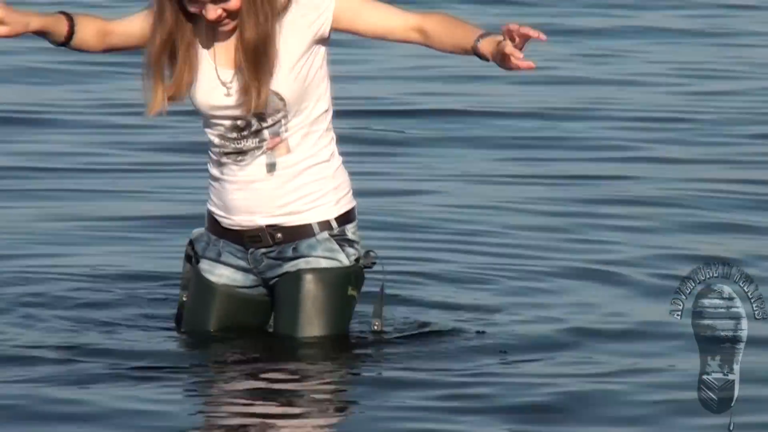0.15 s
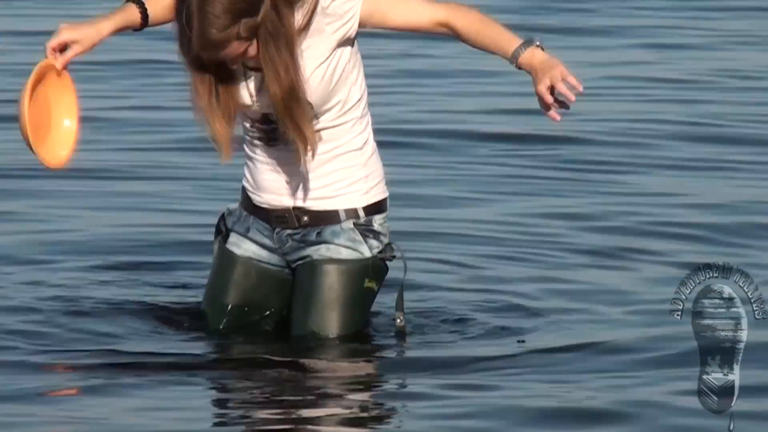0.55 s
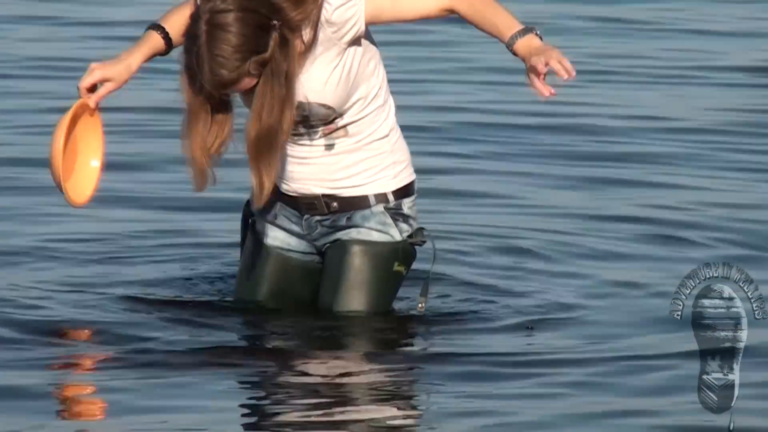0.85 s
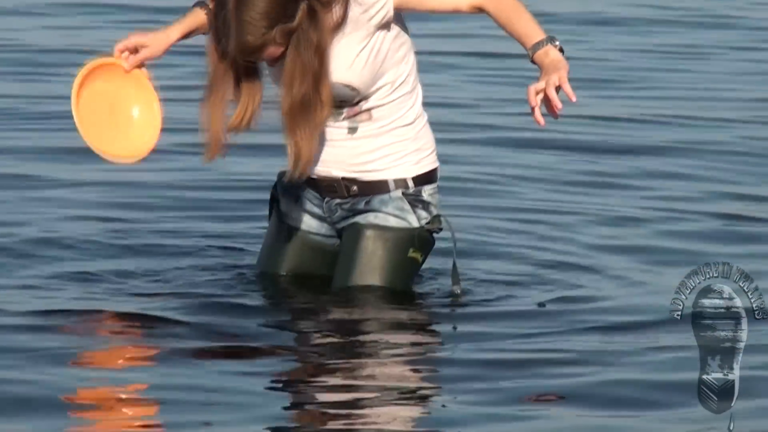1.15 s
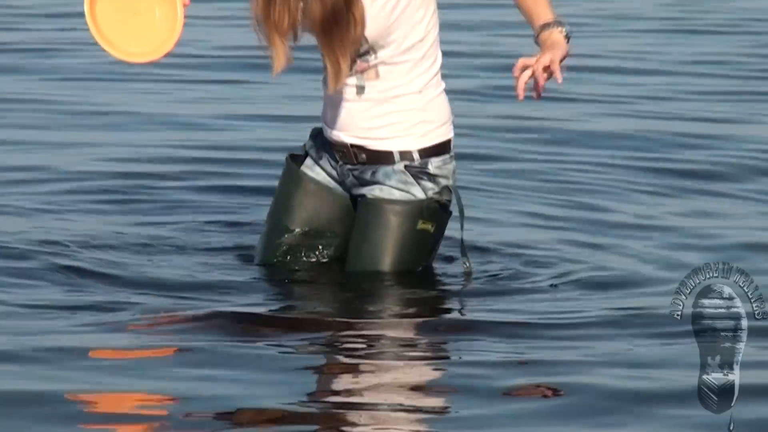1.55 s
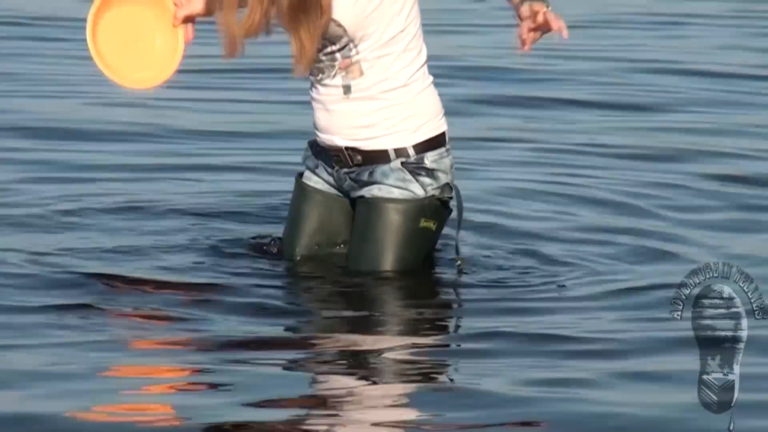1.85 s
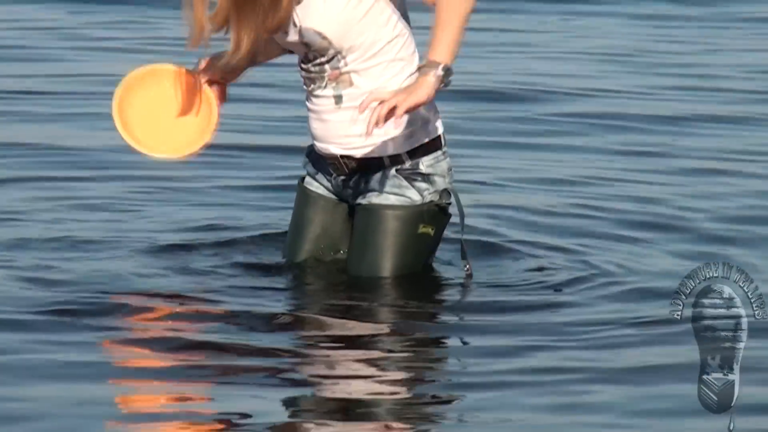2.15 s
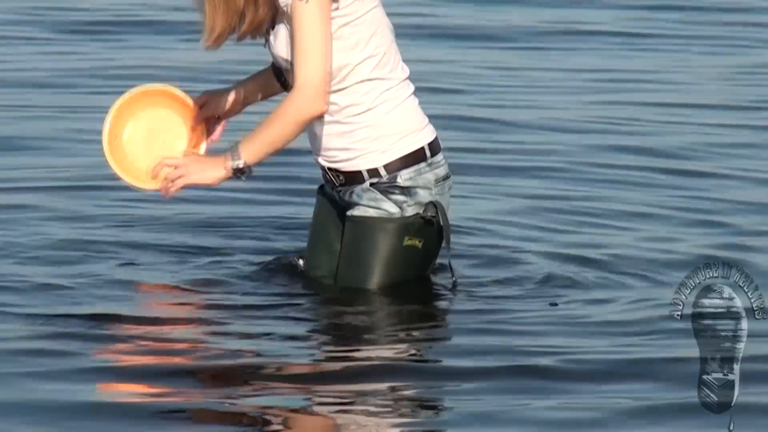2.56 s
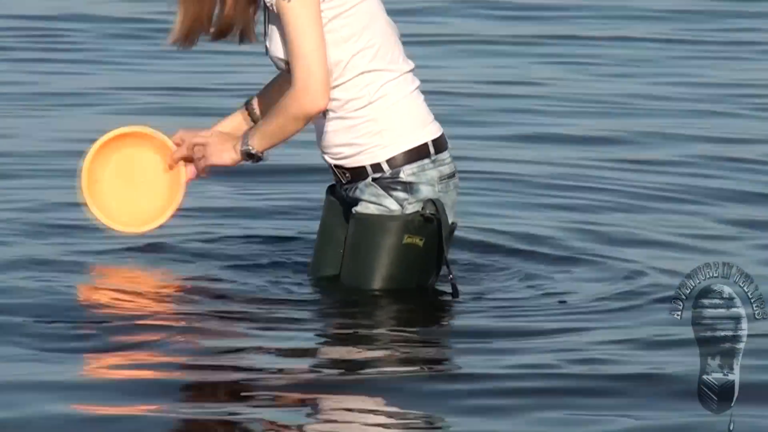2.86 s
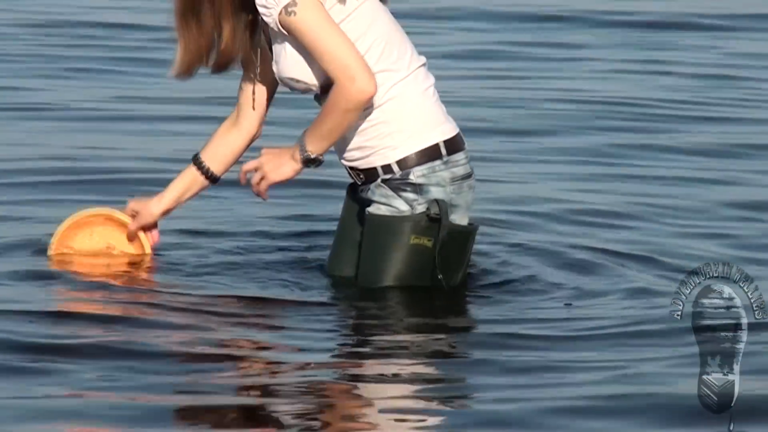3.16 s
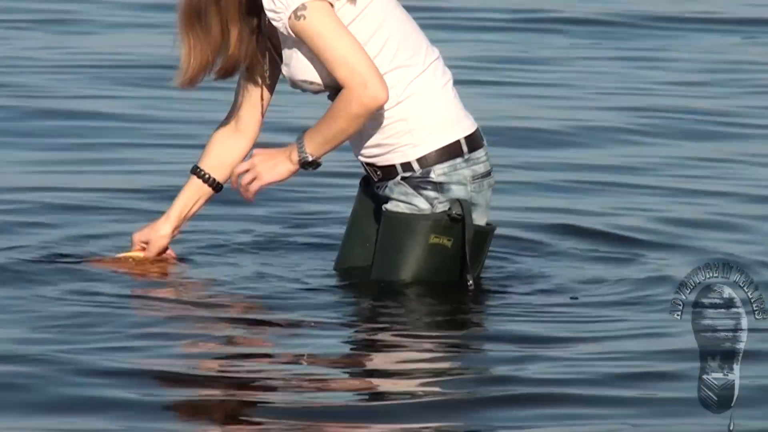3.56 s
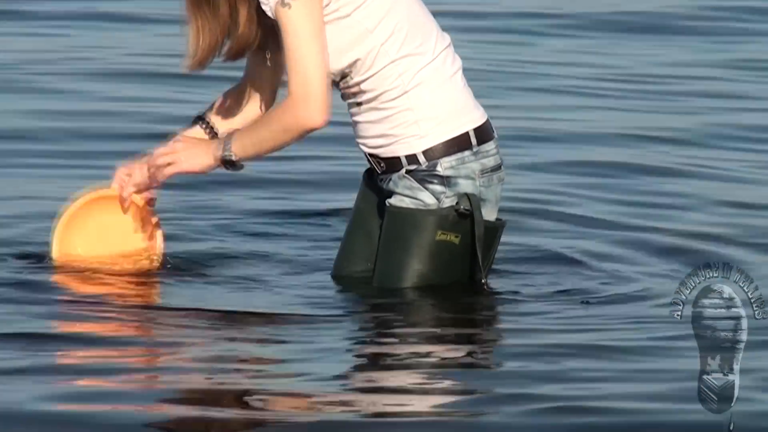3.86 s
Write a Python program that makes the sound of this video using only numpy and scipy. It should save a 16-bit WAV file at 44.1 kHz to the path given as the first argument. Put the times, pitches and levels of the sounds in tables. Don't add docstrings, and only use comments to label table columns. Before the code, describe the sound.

Gentle lake water sloshing and plopping around wading legs, with microphone wind rumble and hiss.

```python
import sys
import numpy as np
from scipy import signal
from scipy.fft import rfft, irfft
from scipy.io import wavfile
from scipy.ndimage import uniform_filter1d

SR = 44100
rng = np.random.default_rng(int(sys.argv[2]) if len(sys.argv) > 2 else 0)


def transcribe(signal):
    frames = np.atleast_2d(signal).T
    limited = np.clip(frames, -1, 1)
    pcm = np.round(limited * 32767).astype(np.int16)
    wavfile.write(sys.argv[1], SR, pcm)


def natural_amplitude(level_db):
    exponent = np.asarray(level_db, float) / 20
    return 10 ** exponent


N = 176400


def rms_one(x):
    return x / np.sqrt(np.mean(x ** 2) + 1e-20)


def in_time(rows):
    return np.interp(np.arange(N) / SR, *np.transpose(rows))


def drift(rate_hz):
    step = 40
    pole = np.exp(-2 * np.pi * rate_hz * step / SR)
    noise = rng.standard_normal(N // step + 2002)
    slow = signal.lfilter([1], [1, -2 * pole, pole ** 2], noise)[2000:]
    return np.interp(np.arange(N) / step, np.arange(len(slow)), rms_one(slow))


def tint(x, *spectra):
    log_hz = np.log(np.arange(N // 2 + 1) * SR / N + 1)
    db = 0
    for points in spectra:
        hz, level_db = np.transpose(points)
        db = db + np.interp(log_hz, np.log(hz), level_db)
    return irfft(rfft(x) * natural_amplitude(db), N)


def band(x, hz, width_hz):
    edges_hz = [hz - width_hz / 2, hz + width_hz / 2]
    return signal.sosfilt(signal.butter(2, edges_hz, "band", fs=SR, output="sos"), x)


def bursts(rows):
    t = np.arange(N) / SR
    return sum(natural_amplitude(db - 60 * np.clip(t - s, 0, 2) / t60_s) * (t > s) for s, db, t60_s in rows)


# (frequency [Hz], level [dB per Hz])
AIR = [(59, -20), (100, 0.5), (264, -16), (370, -12.5), (477, -21), (1060, -18), (2320, -21),
       (13100, -25.5), (15500, -24.5)]
# (frequency [Hz], side over mid [dB])
AIR_SIDE = [(120, -37), (250, -17), (700, -14.5), (4000, -15), (8000, -11), (15000, -9.5)]
# (frequency [Hz], level [dB])
WHINE = [(15575, -71), (15625, -63), (15675, -65)]
AIR_DB, WHINE_TRIM_DB = -44, 2


def air():
    mid, side = rng.standard_normal((2, N))
    mid, side = tint(mid, AIR), tint(side, AIR, AIR_SIDE)
    t = np.arange(N) / SR
    whine = sum(natural_amplitude(db + WHINE_TRIM_DB) * np.sin(2 * np.pi * hz * t) for hz, db in WHINE)
    return natural_amplitude(AIR_DB) / mid.std() * (mid + side * [[1], [-1]]) + whine


# (time [s], level [dB])
GUST = [(0, -27), (.07, -34.5), (.17, -19), (.36, -26), (.6, -16.5), (1.04, -18), (1.15, -25.5),
        (1.45, -25.5), (1.7, -32), (2.1, -32.5), (2.55, -31), (2.8, -19), (3.0, -13.5), (3.25, -18),
        (3.56, -9), (3.68, -21.5), (3.95, -17.5), (4, -28)]
# (frequency [Hz], level [dB per Hz])
WIND = [(7.1, -18), (12, -4.5), (27, -0.5), (41, -4.5), (61, -11.5), (151, -44.5), (260, -59), (340, -82),
        (570, -120)]
WIND_SIDE_DB, WIND_SIDE_STEEP, WIND_LUMP_DB = -37, 1, 1.5
THUMP_S, THUMP_DB, THUMP_WIDTH_S = 3.594, 3, 0.014
BREEZE_HZ, BREEZE_FOLLOWS = 58, 0.98


def wind():
    trim = [(8, -3), (14, -0.5), (260, -4.0), (500, -32)]
    mid, side = tint(rng.standard_normal((2, N)), WIND, trim)
    mid, side = mid / mid.std(), side / mid.std()
    gust_db = in_time(GUST) + WIND_LUMP_DB * drift(12.4)
    below_peak_db = gust_db - gust_db.max()

    swell = uniform_filter1d(uniform_filter1d(mid ** 2, size=4000), size=4000)
    high_pass = signal.butter(2, BREEZE_HZ, "high", fs=SR, output="sos")
    upper = signal.sosfiltfilt(high_pass, mid)
    lower = (mid - upper) / np.sqrt(.5 * swell + .5)
    mid = lower + upper * natural_amplitude((BREEZE_FOLLOWS - 1) * (below_peak_db + 3.0))

    side_db = WIND_SIDE_DB + WIND_SIDE_STEEP * (below_peak_db + 8.5)
    side = tint(side, [(30, -7), (200, 25.5)]) * natural_amplitude(side_db)

    thump = natural_amplitude(THUMP_DB) * np.exp(-np.abs(np.arange(N) / SR - THUMP_S) / THUMP_WIDTH_S)
    thump = tint(thump, [(4, -16), (20, 4), (300, 7.0), (550, 14)])
    both = natural_amplitude(gust_db) * (mid + side * [[1], [-1]]) - thump
    return .95 * np.tanh(both / .95)


# (time [s], level [dB])
STIR = [(0, -54), (.36, -55.5), (.47, -44.5), (.7, -49.5), (.82, -46), (1.04, -47), (1.15, -50),
        (1.5, -53.5), (2.1, -50.5), (2.25, -46), (2.53, -42.5), (2.68, -47), (2.81, -39.5), (2.92, -46.5),
        (3.12, -44.5), (3.36, -41.5), (3.5, -47), (4, -53)]
# (frequency [Hz], level [dB per Hz])
WASH = [(250, -5), (650, -4.5), (1300, -8), (4000, -6.5), (9000, -62)]
WASH_DB = -6.5


def wash():
    noise = rng.standard_normal(N) * natural_amplitude(4.1 * drift(26) + 0.79 * drift(12))
    return natural_amplitude(in_time(STIR) + WASH_DB) * rms_one(tint(noise, WASH))


# (time [s], level [dB], t60 [s])
RUBS = [
    (1.502, -39, .3),
    (1.527, -44, .25),
    (1.655, -46, .06),
    (1.673, -47, .2),
]
RUB_HZ, RUB_WIDTH_HZ, RUBS_PER_S = 3700, 1100, 2600


def strap_rub():
    slips = (rng.random(N) < RUBS_PER_S / SR) * rng.standard_normal(N) * natural_amplitude(1.4 * drift(54))
    return rms_one(band(slips, RUB_HZ, RUB_WIDTH_HZ) + 0.13 * slips) * bursts(RUBS)


# (time [s], level [dB], t60 [s])
SPRAY = [
    (.464, -47, .04),
    (1.025, -48, .06),
    (2.14, -46, .4),
    (2.738, -45, .14),
    (2.808, -46, .2),
    (3.108, -47, .1),
    (3.34, -51, .1),
    (3.387, -41, .04),
    (3.654, -40, .04),
]
SPRAY_HZ, SPRAY_WIDTH_HZ = 4660, 6300


def spray():
    grain = rng.standard_normal(N) * natural_amplitude(3 * drift(200))
    return rms_one(band(grain, SPRAY_HZ, SPRAY_WIDTH_HZ)) * bursts(SPRAY)


FROTH_DB = -11


def froth(water):
    shake = signal.lfilter(*signal.butter(2, 400, fs=SR), rng.standard_normal(N))
    return natural_amplitude(FROTH_DB) * np.roll(water, 220) * rms_one(shake)


WOBBLE, ATTACK_CYCLES = .5, .45


def add_pocket(out, s, db, hz, fade_s, rise_oct):
    t = np.arange(int(2 * fade_s * SR)) / SR
    pitch_hz = np.minimum(hz * 2 ** (rise_oct * t / fade_s), .4 * SR)
    flutter_in = np.minimum(2 * t / fade_s, 1)
    flutter = 1 + WOBBLE * np.sin(2 * np.pi * (hz * t / 11 + s * hz)) * flutter_in
    decay = natural_amplitude(db - 20 * (t / fade_s) ** 1.6)
    attack = 1 - np.exp(-t * hz / ATTACK_CYCLES)
    wave = np.sin(2 * np.pi * np.cumsum(pitch_hz) / SR) * decay * attack * flutter
    i = int(s * SR)
    out[i:i + len(t)] += wave[:N - i]


def swarm(per_s, db, hz, spread_oct, fade_s, rise_oct):
    out, stir_db = np.zeros(N), in_time(STIR)
    s, keep, size, long, climb, u, v = rng.random((2500, 7)).T
    s = s * (N - 1) / SR
    here_db = stir_db[(s * SR).astype(int)]
    normal = np.sqrt(-2 * np.log(u)) * np.cos(2 * np.pi * v)
    scale = 2 ** (spread_oct * np.clip(normal, -1.8, 1.8))
    level_db = here_db + db - 3.23 * np.log(size + 0.058)
    fades_s = fade_s * (0.45 + 1.71 * long ** 2) / scale
    rises_oct = rise_oct * (2.57 * climb - .6)
    chance = per_s * N / SR / len(s) * natural_amplitude(.4 * (here_db - stir_db.max()))
    for k in np.flatnonzero(keep < chance):
        add_pocket(out, s[k], level_db[k], hz * scale[k], fades_s[k], rises_oct[k])
    return out


# (time [s], peak [dB], pitch [Hz], 20 dB fade [s], rise [octaves])
PLOPS = [(.384, -32, 800, .045, .6), (.435, -35, 720, .025, .1), (.471, -29, 830, .04, -.15),
         (.48, -34, 580, .06, .6), (.582, -36, 400, .015, .1), (.639, -30, 340, .025, .3),
         (.673, -30, 350, .035, .3), (.778, -30, 700, .03, .3), (.804, -33, 500, .015, .1),
         (.961, -28, 560, .02, .15), (.975, -35, 680, .04, .3), (1.0252, -25, 1700, .0035, .7),
         (1.034, -30, 2500, .009, .15), (1.046, -31, 650, .008, .1), (1.23, -40, 620, .04, .1),
         (1.532, -38, 1200, .008, .3), (1.717, -39, 1000, .014, .02), (1.771, -39, 690, .015, .1),
         (1.781, -36, 380, .035, .2), (2.005, -33, 730, .035, .2),
         (2.227, -33, 850, .035, -.4), (2.307, -34, 720, .07, -.15), (2.434, -30, 850, .025, .1),
             (2.498, -31, 560, .015, -.1), (2.569, -30, 500, .07, .6), (2.696, -34, 350, .045, .05),
             (2.742, -27, 740, .025, .3), (2.762, -27, 330, .03, .1), (2.7935, -11, 430, .014, 1.1),
             (2.806, -27, 1120, .018, .2), (2.866, -28, 650, .035, .2), (2.962, -29, 540, .06, .7),
             (2.968, -33, 950, .025, .15), (3.1, -26, 780, .03, .05), (3.114, -25, 430, .055, .45),
             (3.155, -33, 760, .05, .15), (3.226, -29, 640, .025, .1), (3.295, -22, 640, .02, .1),
             (3.346, -23, 660, .035, -.1), (3.519, -33, 520, .065, .02), (3.599, -33, 750, .045, .2),
             (3.665, -29, 1150, .005, .6), (3.679, -34, 1000, .045, .8), (3.741, -31, 490, .04, .1),
             (3.752, -37, 1400, .02, .15), (3.853, -38, 1400, .012, .1), (3.87, -37, 720, .03, .02),
             (3.925, -39, 720, .03, .2)]
# (time [s], peak [dB], pitch [Hz])
DROPS = [(0.4623, -37.5, 4500), (0.4655, -27, 3410), (0.5636, -36, 2170), (0.7964, -39, 2380),
         (0.8079, -37, 1880), (0.8601, -33.5, 2540), (0.9193, -38, 2960), (0.9288, -41.5, 5900),
         (0.9985, -35.5, 1980), (1.0252, -25, 2170), (1.0403, -31, 1800), (1.0744, -36, 3940),
         (1.1414, -38, 3010), (1.244, -35.5, 1726), (1.311, -37.5, 2430), (1.7216, -41, 5080),
         (2.1737, -40, 2190), (2.1881, -39, 1970), (2.2326, -39, 2500), (2.236, -35, 1420),
         (2.253, -39, 3420), (2.3144, -35, 3030), (2.3493, -37, 2930), (2.3578, -32.5, 1277),
         (2.367, -35.5, 4560), (2.417, -32, 1160), (2.4447, -32, 1250), (2.471, -40, 2070),
         (2.487, -41, 1530), (2.5024, -36, 2200), (2.5333, -24, 1105), (2.5431, -38, 3470),
         (2.5434, -31, 1960), (2.5602, -38, 1830), (2.565, -41, 4220), (2.57, -34.5, 3440),
         (2.578, -43, 4390),
         (2.6004, -42, 2020), (2.615, -35.5, 3010), (2.6586, -38, 2840), (2.6963, -38.5, 3190),
             (2.697, -40, 3960), (2.7367, -40.5, 4090), (2.7432, -40, 6630), (2.776, -41, 3790),
             (2.7785, -35, 1770), (2.789, -36, 1210), (2.81, -34, 2070), (2.8106, -47, 5990),
             (2.8188, -25, 1250), (2.8182, -41, 2630), (2.838, -41, 2070), (2.9646, -35, 3830),
             (2.975, -36, 2970), (2.9939, -32.5, 1590), (3.015, -38, 1940), (3.0293, -29.5, 3270),
             (3.0504, -39, 1680), (3.1086, -32, 2370), (3.1139, -33, 3190), (3.1147, -34, 4050),
             (3.1334, -33.5, 3010), (3.1386, -33, 1120), (3.1579, -40, 3960), (3.1587, -39, 2410),
             (3.1708, -39, 3060), (3.1708, -36, 3490), (3.183, -40, 5900), (3.194, -38, 4180),
             (3.2076, -37, 2800), (3.23, -40, 2410), (3.2341, -42, 1980), (3.2591, -31.5, 1680),
             (3.2692, -39, 1850), (3.3025, -36, 1590), (3.307, -42, 4220), (3.317, -40, 2150),
             (3.3182, -38, 1720), (3.3198, -40, 3960), (3.344, -34, 2800), (3.344, -39, 5990),
             (3.3589, -32, 2280), (3.3588, -24.5, 1510), (3.3707, -42, 4260), (3.3749, -34, 2330),
             (3.3863, -39, 4870), (3.3893, -36, 1120), (3.3901, -36, 3700), (3.391, -42, 5340),
             (3.3905, -49, 6500), (3.4048, -35.5, 1980), (3.4512, -31.5, 1340), (3.4545, -31, 1850),
             (3.513, -35.5, 1590), (3.6952, -36, 1340), (3.799, -34, 3700)]
ROUGH_DB, PLOP_TRIM_DB, DROP_TRIM_DB = 2.5, -2.5, 3.5
DROP_CYCLES, DROP_RISE_OCT, DROP_RING_S = 8, .1, .003


def pockets():
    out = np.zeros(N)
    for row in PLOPS:
        add_pocket(out, *row)
    for s, db, hz in DROPS:
        add_pocket(out, s, db + DROP_TRIM_DB, hz, DROP_CYCLES / hz + DROP_RING_S, DROP_RISE_OCT)
    return out * natural_amplitude(PLOP_TRIM_DB + ROUGH_DB * np.tanh(drift(90)))


def scene():
    gurgles = swarm(per_s=300, db=-1.5, hz=685, spread_oct=.4, fade_s=0.019, rise_oct=0.299)
    ticks = swarm(per_s=400, db=-3, hz=1900, spread_oct=.6, fade_s=0.008, rise_oct=0.26)
    water = wash() + strap_rub() + spray() + gurgles + ticks + pockets()
    return air() + wind() + water + froth(water)


def band_limit(x):
    return signal.sosfilt(signal.butter(12, 15730, fs=SR, output="sos"), x)


def record(dry):
    low_pass = signal.ellip(12, .5, 70, 15730, fs=SR, output="sos")
    mix = signal.sosfilt(low_pass, dry)
    return band_limit(mix)


dry = scene()
out = record(dry)
transcribe(out)
```